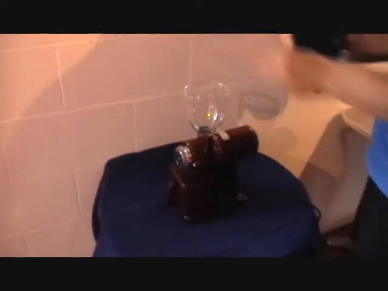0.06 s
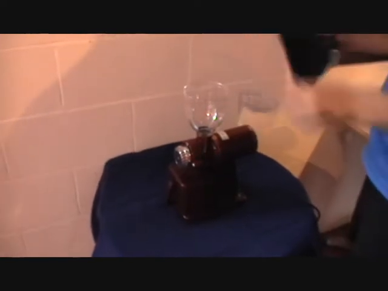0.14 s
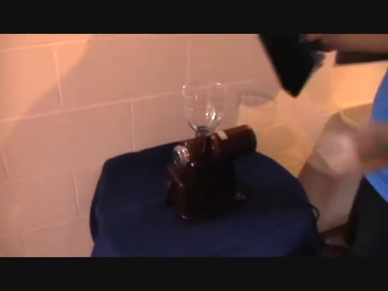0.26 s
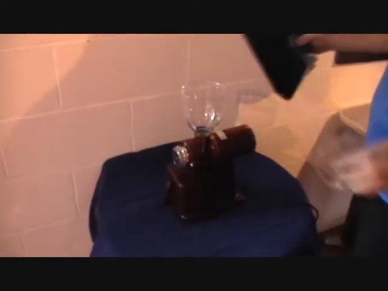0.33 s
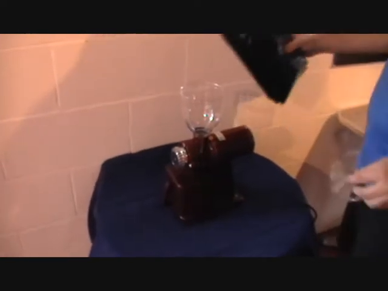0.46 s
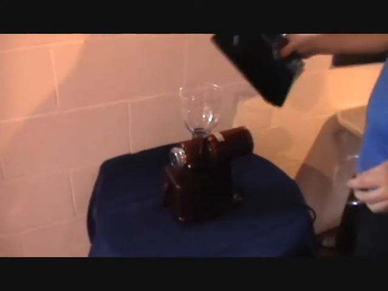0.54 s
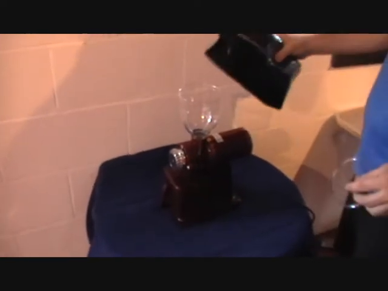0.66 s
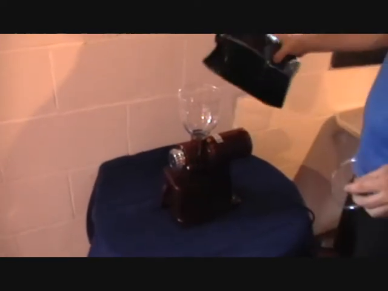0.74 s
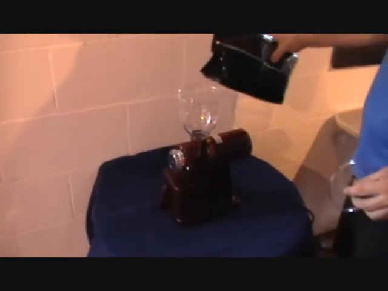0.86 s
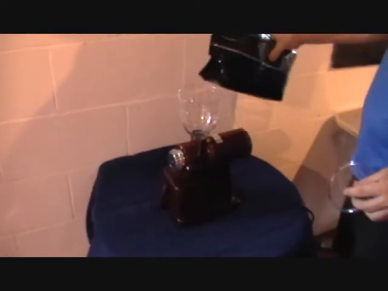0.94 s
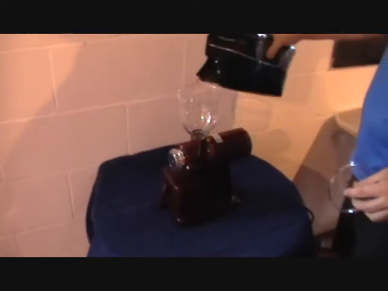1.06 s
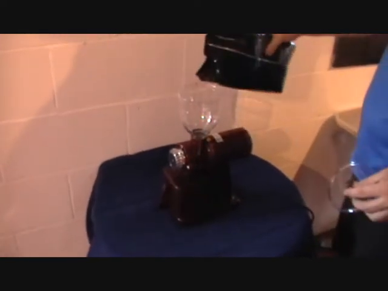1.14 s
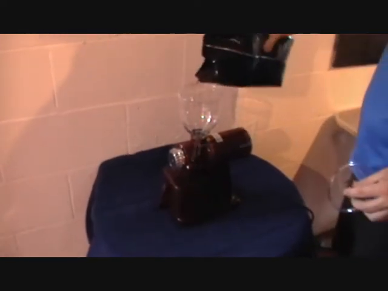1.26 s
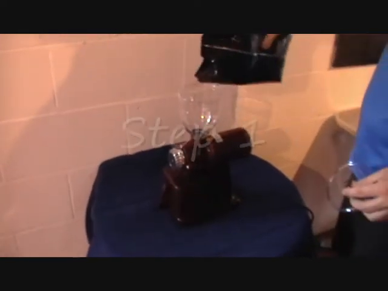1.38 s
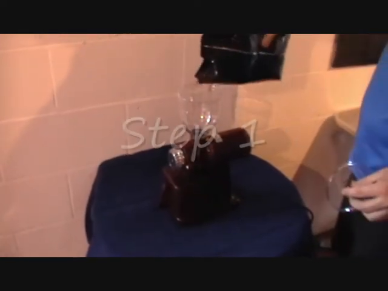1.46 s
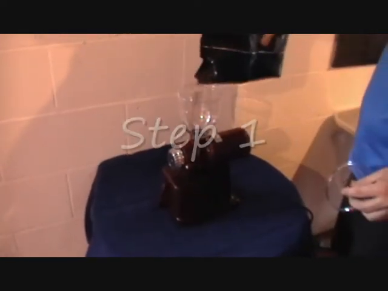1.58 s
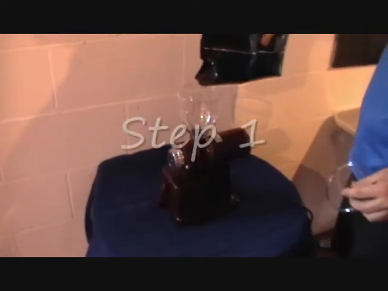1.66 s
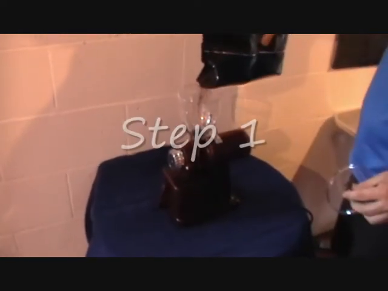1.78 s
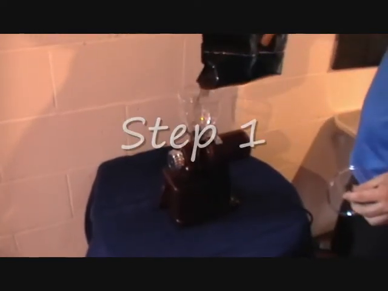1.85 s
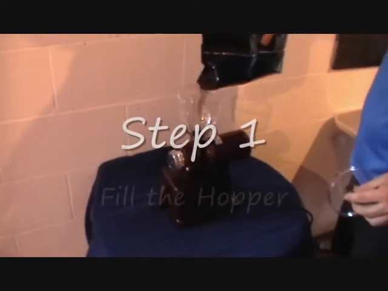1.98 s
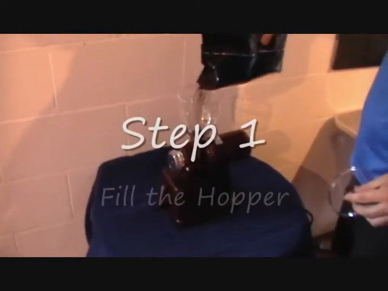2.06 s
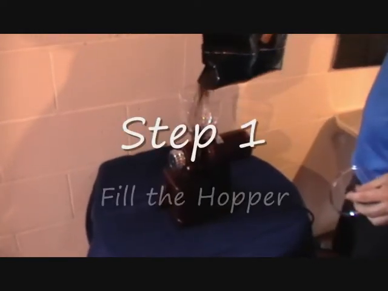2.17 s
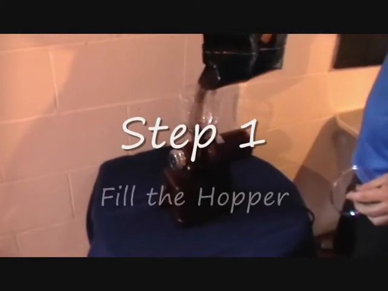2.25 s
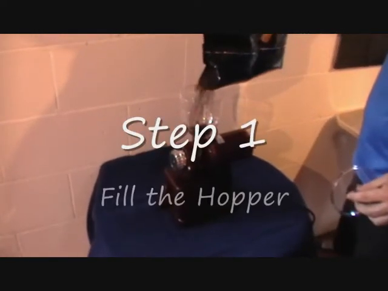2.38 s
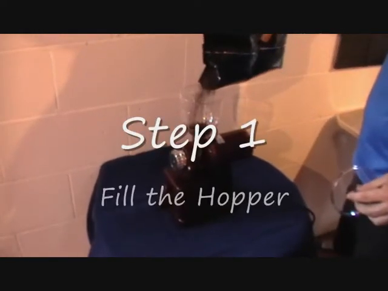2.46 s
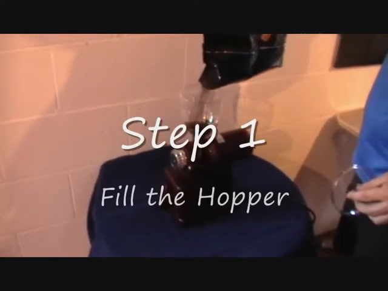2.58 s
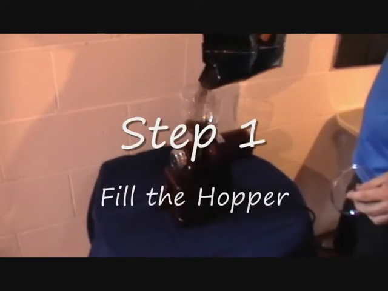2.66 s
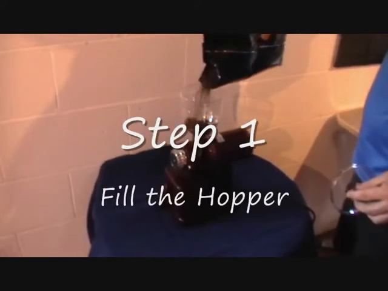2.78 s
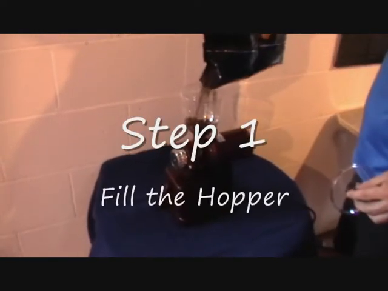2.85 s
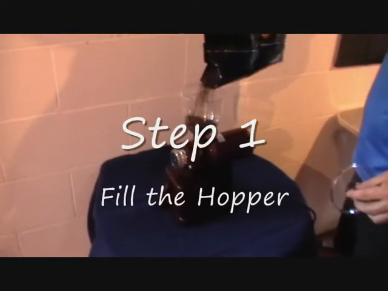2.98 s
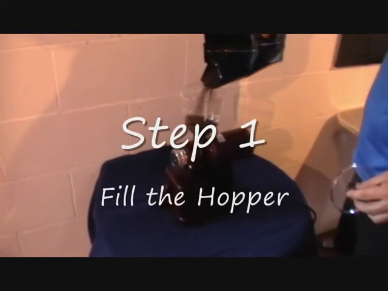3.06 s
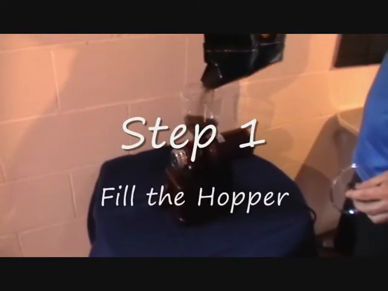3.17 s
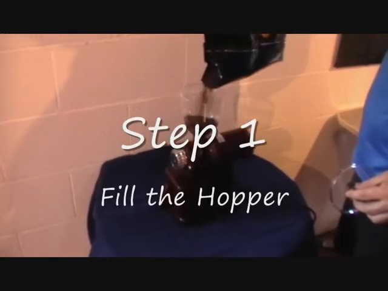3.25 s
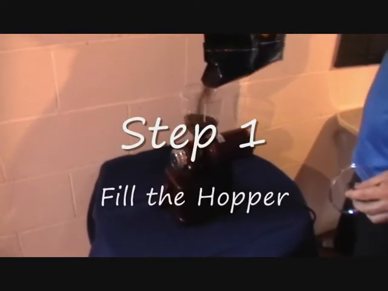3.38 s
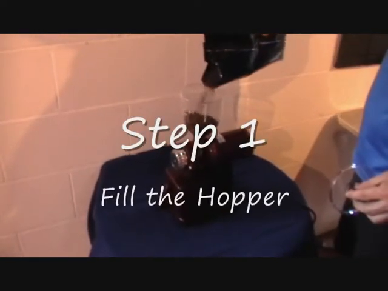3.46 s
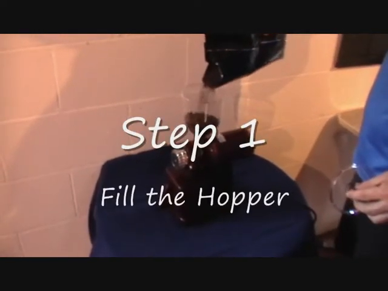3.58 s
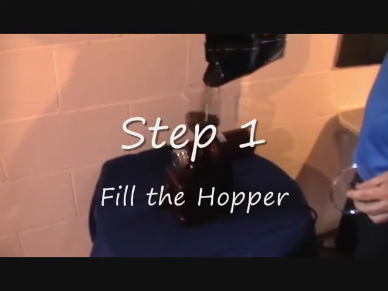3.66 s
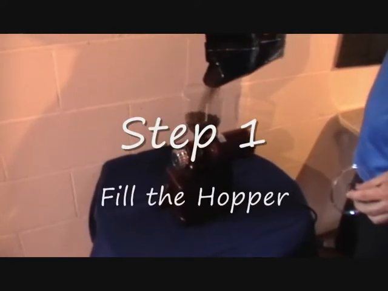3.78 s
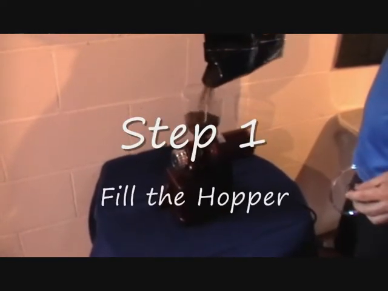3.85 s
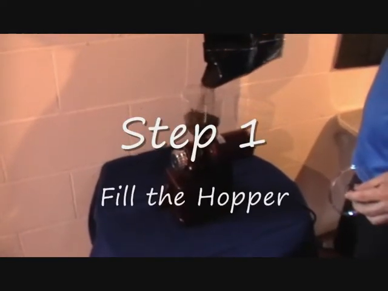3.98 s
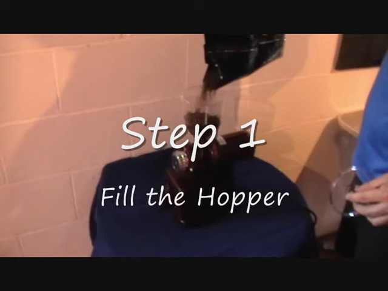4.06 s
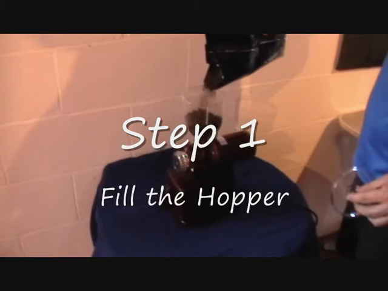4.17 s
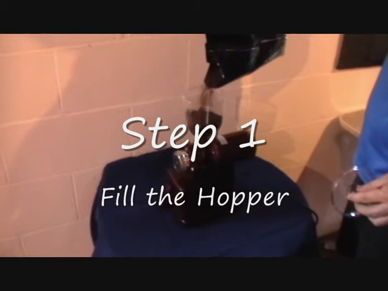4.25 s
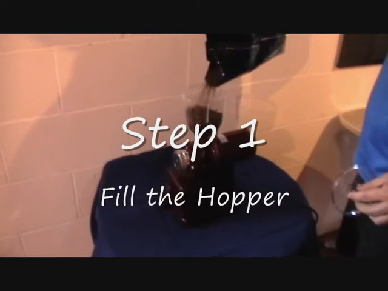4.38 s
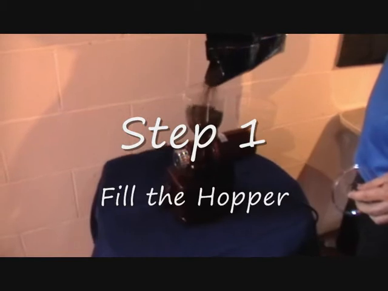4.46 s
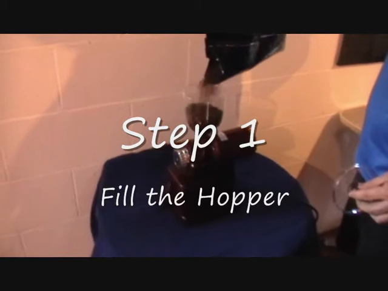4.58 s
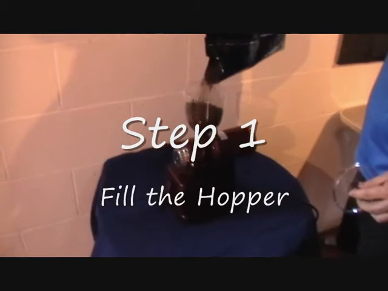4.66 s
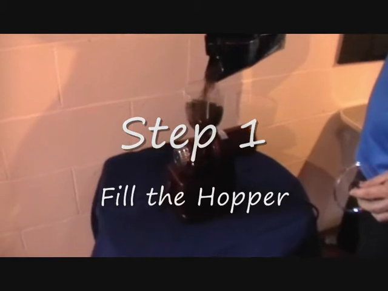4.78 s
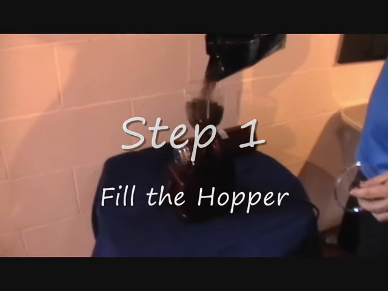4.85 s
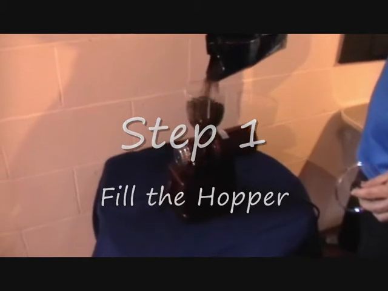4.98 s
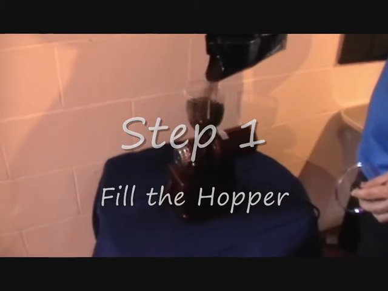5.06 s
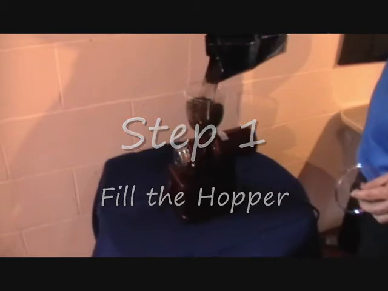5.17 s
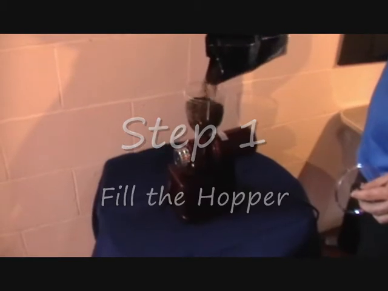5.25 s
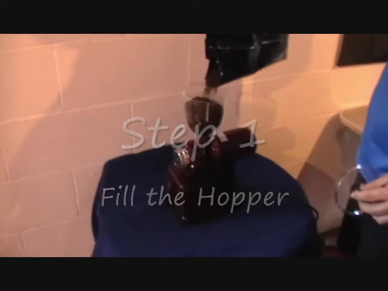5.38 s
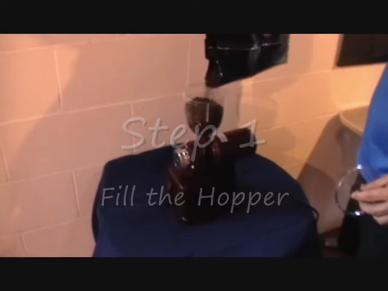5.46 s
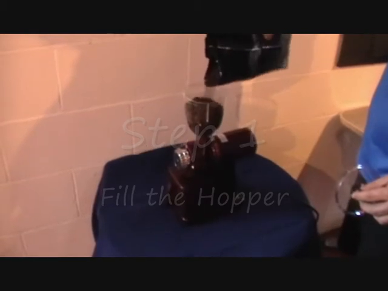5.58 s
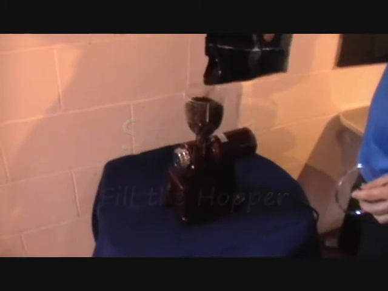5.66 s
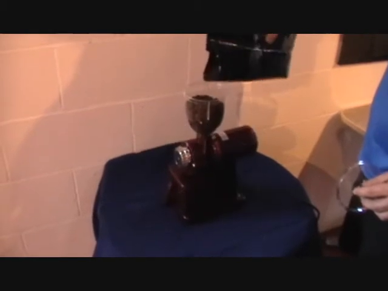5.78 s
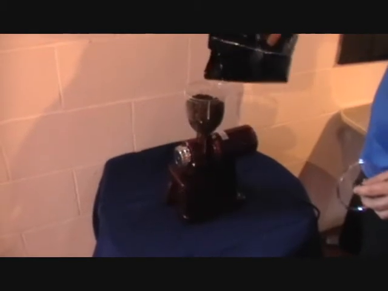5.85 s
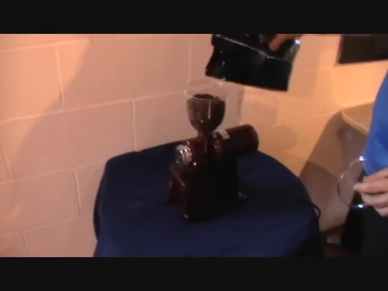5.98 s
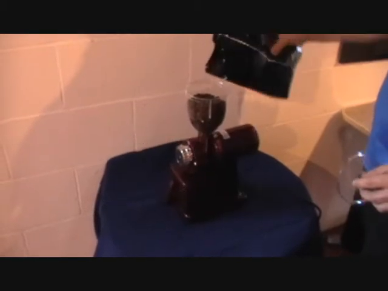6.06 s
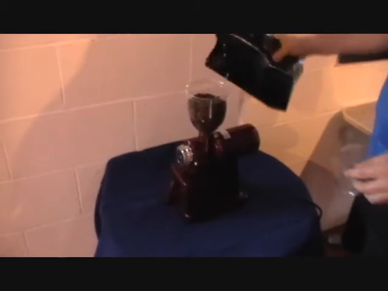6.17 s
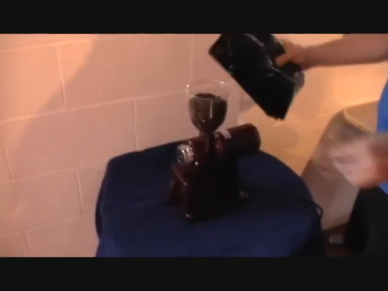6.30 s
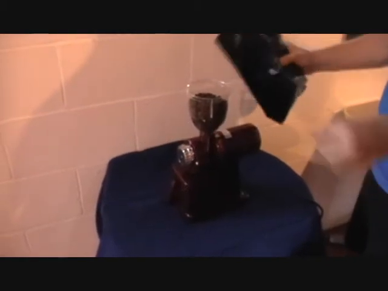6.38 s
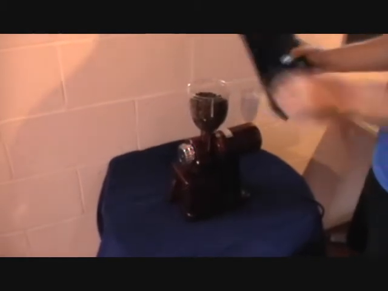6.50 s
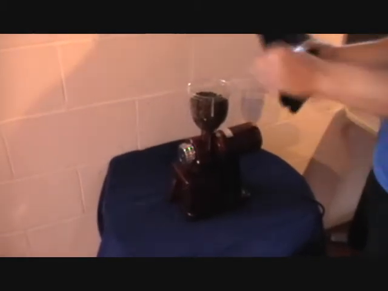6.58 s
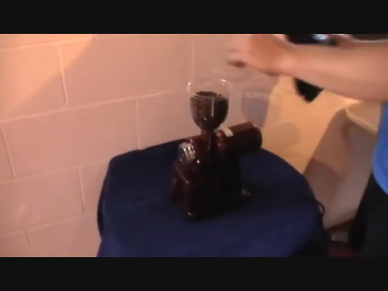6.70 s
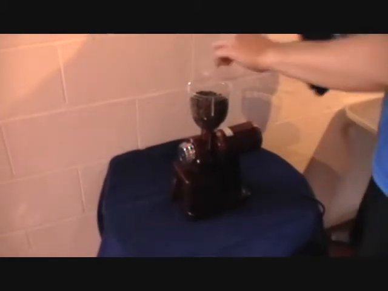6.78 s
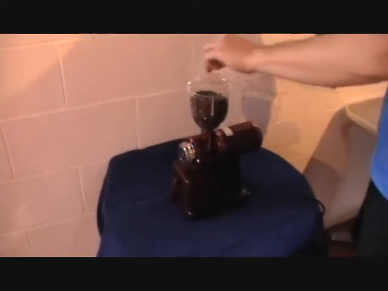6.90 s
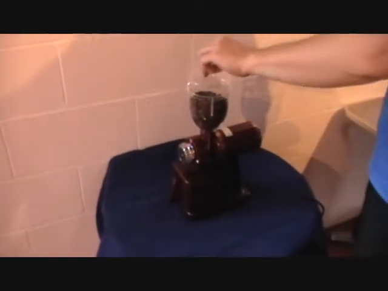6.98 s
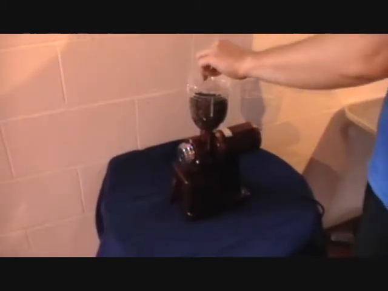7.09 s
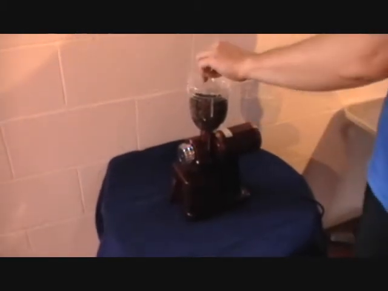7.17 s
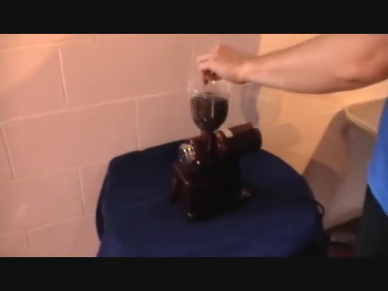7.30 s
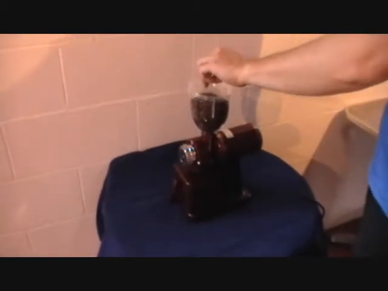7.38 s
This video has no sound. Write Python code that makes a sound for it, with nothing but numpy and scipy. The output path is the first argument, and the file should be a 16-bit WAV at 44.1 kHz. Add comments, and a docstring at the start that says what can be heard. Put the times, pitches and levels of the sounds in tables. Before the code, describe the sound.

Coffee beans slide in a foil bag, then rattle brightly into an empty hopper, dulling as it fills, ending with foil snaps in a humming hard-walled room.

```python
"""Coffee beans are poured from a foil bag into a grinder's hopper in a hard-walled room. Duct-resonant noise hums
throughout; first a lid squeaks in rough tone glides, and beans slide in the bag as grains of noise while foil snaps.
The first beans then strike the empty funnel's modes; as it fills they excite the broad, short modes of the heap,
over narrow-band noise whose hollow note rises. Afterwards the foil snaps and the beans slide again."""
import sys
import numpy as np
from scipy import signal
from scipy.fft import rfft, irfft, next_fast_len
from scipy.io import wavfile
from scipy.ndimage import uniform_filter1d, map_coordinates

SR = 44100
rng = np.random.default_rng(int(sys.argv[2]) if len(sys.argv) > 2 else 0)


def materialize(psi):
    """Save the field psi as 16-bit PCM at rate SR to the path in sys.argv[1].

    A 1-D psi becomes a single channel; in a 2-D psi each row is a channel.
    """
    bounded = np.clip(np.atleast_2d(psi).T, -1, 1)
    quanta = np.round(bounded * 32767).astype(np.int16)
    wavfile.write(sys.argv[1], SR, quanta)


N = 327663


def amp(db):
    """Level: decibels become an amplitude ratio."""
    return 10 ** (np.asarray(db) / 20)


def unit(x):
    """Normalisation: the signal is scaled to unit RMS."""
    return x / np.sqrt(np.mean(x ** 2) + 1e-20)


def along(points, hz):
    """Logarithmic pitch scale: (Hz, value) points are interpolated over log frequency."""
    f, v = np.transpose(points)
    return np.interp(np.log(hz + 1), np.log(f + 1), v)


def curves(rows):
    """Envelope: one value per sample for each column after the time, and a gate open while the table lasts."""
    s, *cols = np.transpose(rows)
    t = np.arange(N) / SR
    gate = np.interp(t, [s[0] - .03, s[0], s[-1], s[-1] + 0.068], [0, 1, 1, 0])
    return [np.interp(t, s, c) for c in cols] + [gate]


def filtered(x, response):
    """Linear filtering: the spectrum is multiplied by a response of frequency."""
    m = next_fast_len(N + SR // 2)
    return irfft(rfft(x, m) * response(np.fft.rfftfreq(m, 1 / SR)), m)[..., :N]


def coloured(x, spectrum):
    """Minimum phase: a causal filter with the given (Hz, dB) gain is made by folding its cepstrum."""
    gain = amp(along(spectrum, np.fft.rfftfreq(2048, 1 / SR)))
    cepstrum = irfft(np.log(gain + 1e-6))
    cepstrum[1:1024] *= 2
    cepstrum[1025:] = 0
    impulse_response = irfft(np.exp(rfft(cepstrum)))
    return signal.fftconvolve(x, impulse_response)[:N]


def mode(x, hz, width_hz):
    """Resonance: one second-order mode with gain 1 at its peak; a wider mode rings for less time."""
    return signal.lfilter(*signal.iirpeak(hz, hz / width_hz, SR), x)


def grit(density, smooth):
    """Friction noise: dense random contacts stand out of a smooth rush."""
    contact = (rng.random(N) < density) * np.minimum(rng.exponential(1.75, N), 4.5)
    return rng.standard_normal(N) * (smooth + contact)


def burst(hz, octaves, t60, echo_db):
    """Transient and diffuse field: a decaying noise click, then the room's duller answer to it."""
    t = np.arange(SR // 2) / SR
    # (distance from the centre in units of octaves, dB)
    steps = [(-4.5, -25.5), (-1, 1.0), (0, 9.0), (2.13, -18), (1.0, -9.5), (4.0, -50)]
    shape = [(hz * 2 ** (k * octaves), db) for k, db in steps]

    def noise():
        return coloured(rng.standard_normal(len(t)), shape)[:len(t)]

    click = unit(noise()) * amp(-60 * t / t60) * (1 - np.exp(-t / 0.00027))
    wash = unit(signal.lfilter(*signal.butter(1, 7000, fs=SR), noise()))
    return click + amp(echo_db - 60 * t / 0.57) * (1 - np.exp(-t / 0.0042)) * wash


# Level of the background hum, lower while the pour is loudest.
# Each row: time in seconds, level of the air in dB, level of the wavering duct note in dB.
HUM_LEVELS = [(0, -57.5, -67), (.5, -62, -64), (0.91, -62, -56), (1.55, -60.5, -73.5), (2.38, -68, -71.5),
              (2.61, -70, -73.5), (2.95, -60, -61.5), (4.6, -59, -66.5), (6.4, -61, -66),
              (7.43, -60, -70.5)]
# Spectrum of the moving air. Each row: frequency in Hz, relative level in dB.
AIR_SPECTRUM = [(20, -30.5), (45, -27), (75, -3), (130, -12.5), (200, -4.5), (300, -4.5), (600, -8),
                (1200, -11.5), (2000, -19.5), (4000, -25.5), (7000, -28), (11000, -47.5), (16000, -46)]
# Resonances of the duct. Each row: frequency in Hz, width in Hz, level relative to the other resonances in dB.
DUCT_MODES = [(101.7, 11, -4), (195.6, 14, 2), (234, 14, -3.5)]


def hum():
    """Duct resonance: broad ventilation noise is joined by noise in a few boomy modes and a wavering narrow band."""
    air_db, note_db, _ = curves(HUM_LEVELS)
    boom = sum(amp(db) * unit(mode(rng.standard_normal(N), hz, width_hz)) for hz, width_hz, db in DUCT_MODES)
    air = unit(filtered(rng.standard_normal(N), lambda hz: amp(along(AIR_SPECTRUM, hz))))
    note = unit(mode(rng.standard_normal(N), 161, 2.8))  # so narrow that its level wavers
    return amp(air_db) * (air + amp(-5) * boom) + amp(note_db) * note


# Squeaks of the lid.
# Each row: start in seconds, length in seconds, first frequency in Hz, last frequency in Hz, level in dB.
LID_SQUEAKS = [(0.027, 0.099, 5320, 6700, -66), (0.05, 0.16, 2790, 3480, -65.5),
               (0.023, .05, 4150, 4400, -72.5), (.06, 0.17, 5400, 5700, -70.5),
               (0.087, 0.12, 6800, 7100, -83), (0.166, 0.093, 4600, 4550, -77)]


def squeaks():
    """Frictional squeal: plastic on plastic gives thin tone glides, roughened by random frequency modulation."""
    out = np.zeros(N)
    for s, length, from_hz, to_hz, db in LID_SQUEAKS:
        u = np.linspace(0, 1, round(length * SR))
        hz = from_hz + (to_hz - from_hz) * np.sqrt(u) + 850 * rng.standard_normal(len(u))
        swell = np.sin(np.pi * u ** 0.46)
        out[round(s * SR):][:len(u)] += amp(db) * swell * np.sin(2 * np.pi * np.cumsum(hz) / SR)
    return out


# Beans sliding in the bag, before and after the pour: one list of rows for each slide.
# Each row: time in seconds, level of the low part in dB, level of the treble part in dB.
BAG_SLIDES = [
    [(0.1, -68.5, -94), (0.442, -59, -72.5), (0.63, -59, -69), (0.926, -52, -55.5), (1.05, -51.5, -53),
     (1.35, -57, -63.5), (1.5, -59, -55)],
    [(6.55, -85, -78), (6.724, -70, -73.5), (6.862, -57.5, -66), (7.064, -47.5, -56), (7.152, -48.5, -57.5),
     (7.43, -57, -65)],
]
# Spectrum of the low part. Each row: frequency in Hz, relative level in dB.
SLIDE_LOW_SPECTRUM = [(150, -56.5), (250, -24), (291, -1.5), (355, -4), (993, 1), (1080, 0.5), (5000, -15),
                      (6500, -35), (11000, -120)]
# Spectrum of the treble part. Each row: frequency in Hz, relative level in dB.
SLIDE_HIGH_SPECTRUM = [(1470, -23), (2500, 0), (3690, -8), (4690, -4.5), (8020, -3), (12800, -12),
                       (16000, -20)]


def slides():
    """Sliding friction: beans rub along the foil in dense soft grains, low and treble levels moving apart."""
    out = np.zeros(N)
    for rows in BAG_SLIDES:
        low_db, high_db, gate = curves(rows)
        out += gate * amp(low_db) * unit(coloured(grit(0.016, 0.58), SLIDE_LOW_SPECTRUM))
        out += gate * amp(high_db) * unit(coloured(grit(0.013, 0.54), SLIDE_HIGH_SPECTRUM))
    return out


def place(out, s, sound):
    """Superposition: a sound is added from its start in seconds."""
    out[round(s * SR):][:len(sound)] += sound


# Soft knocks of the bag in the hand. Each row: start in seconds, level in dB, centre frequency in Hz.
BAG_KNOCKS = [(0.286, -43, 636), (1.064, -48, 580), (3.409, -41.5, 1200), (3.539, -45.5, 810),
              (4.25, -47, 1000), (4.452, -42, 1580), (5.481, -44.5, 1302), (7.063, -44, 1210),
              (7.372, -48, 1000)]


def knocks():
    """Damped impact: a soft blow is a broad noise burst around a low centre, with no foil click."""
    out = np.zeros(N + SR)
    for s, db, hz in BAG_KNOCKS:
        place(out, s, amp(db) * burst(hz, 1.6, t60=0.062, echo_db=-11.5))
    return out[:N]


# Foil snaps and stray beans.
# Each row: start in seconds, level in dB, centre frequency in Hz, thump relative to the snap in dB.
FOIL_SNAPS = [(0.4413, -34, 7700, -26), (0.5805, -44, 7900, -15), (0.593, -43, 3670, -20),
              (0.733, -44, 3550, -18), (0.753, -39, 6880, -7.5), (0.9756, -43.5, 4540, -4),
              (1.1613, -41.5, 9100, -17), (1.274, -46, 4870, -32), (5.7587, -51, 8360, -33),
              (5.7744, -47, 11400, -20), (5.8097, -48.5, 9940, -28), (5.8234, -51.5, 10770, -22),
              (5.8768, -46.5, 12300, -33), (5.886, -42.5, 6400, -32), (5.9224, -46, 5960, -30),
              (5.952, -43, 9920, -36), (6.0457, -52, 6440, -20), (6.108, -24.5, 6800, -46),
              (6.2516, -45.5, 5950, -29)]


def snaps():
    """Sudden buckling: a short bright click carries a softer, longer thump beneath it."""
    out = np.zeros(N + SR)
    for s, db, hz, thump_db in FOIL_SNAPS:
        click = burst(hz, 0.61, t60=0.02, echo_db=-22)
        thump = burst(1200, 1.0, t60=0.067, echo_db=-29)
        place(out, s, amp(db) * (click + amp(thump_db) * thump))
    return out[:N]


def contacts(s, size, tumble_s, count):
    """Repeated impact: a landing bean tumbles in a short run of contacts; returns sample index and strength."""
    late = rng.gamma(1.3, 1, (len(s), count)) * (np.arange(count) > 0)  # the first contact is not delayed
    at = np.minimum(((s[:, None] + tumble_s * late) * SR).astype(int), N - 1)
    return at, size[:, None] * np.exp(-.2 * late) / np.sqrt(count)


def impulses(at, size):
    """Impulsive force: each contact is one sample of random strength and sign."""
    return np.bincount(at.ravel(), (size * rng.standard_normal(at.shape)).ravel(), N)


def struck(at, size, modes):
    """Modal excitation: each contact strikes a new spot, so every mode gets its own strength and sign."""
    out = np.zeros(N)
    for hz, width_hz, db in modes:
        out += amp(db) * mode(impulses(at, size), hz, width_hz)
    return out


# Share of ringing funnel modes in each contact; the rest is heap. Each row: time in seconds, share from 0 to 1.
RING_SHARE = [(1.3, 0.65), (2.4, 0.81), (2.9, 0.65), (3.3, 0.01), (4.2, 0.25), (5.8, 0.16)]
# Modes of the funnel. Each row: frequency in Hz, width in Hz, relative level in dB.
FUNNEL_MODES = [(2974, 16, -7), (3860, 62, -5.5), (4015, 27, -6), (4500, 83, -9), (4737, 66, -6),
                (4900, 138, -4), (5480, 45, -2.5), (5556, 110, -4), (5830, 65, -6.5), (6040, 57, -5.5),
                (6360, 89, -0.5), (7040, 110, -6.5), (6950, 58, -3), (7230, 120, -10.5), (7784, 59, -6.5),
                (8120, 58, -10.5), (8420, 49, -11.5), (8660, 100, -7), (9065, 48, -6.5), (9820, 31, -9.5),
                (9700, 90, -11), (9500, 140, -19), (11420, 71, -17.5), (10900, 370, -20.5)]
# Modes of beans landing on beans. Each row: frequency in Hz, width in Hz, relative level in dB.
HEAP_MODES = [(2740, 69, -12.5), (3086, 63, -4.5), (4110, 140, -5), (4940, 138, 0.5), (5560, 230, -4.5),
              (6280, 1020, 1), (8210, 350, -6.5), (9690, 360, -9.5)]
# Spectrum of the first instant of a contact. Each row: frequency in Hz, relative level in dB.
CRACK_SPECTRUM = [(900, -30.5), (1500, -30), (2500, -25.5), (3400, -13.5), (4600, -4), (6300, -1.5),
                  (7600, -7), (10000, -9), (13000, -18), (16000, -40)]
# bright tick of a bean on the funnel and on the heap, and its scatter from bean to bean
TREBLE_FUNNEL_DB, TREBLE_HEAP_DB, TREBLE_SCATTER_DB = -15.5, -20, 3.5


def clatter(s, size, tumble_s, count):
    """Damping: contacts share their force between the ringing funnel and the more heavily damped heap."""
    at, size = contacts(s, size, tumble_s, count)
    ring = np.clip(np.interp(at / SR, *np.transpose(RING_SHARE)), 0, 1)
    treble_db = TREBLE_FUNNEL_DB * ring + TREBLE_HEAP_DB * (1 - ring)
    treble_db = treble_db + TREBLE_SCATTER_DB * rng.standard_normal((len(s), 1))
    high_pass = signal.butter(3, 9500, "high", fs=SR)
    bright = signal.lfilter(*high_pass, impulses(at, size * amp(treble_db)))
    crack = coloured(impulses(at, size), CRACK_SPECTRUM)
    wall = struck(at, size * ring, FUNNEL_MODES)
    heap = struck(at, size * (1 - ring), HEAP_MODES)
    return amp(17) * crack + amp(16.5) * bright + amp(34.0) * wall + amp(28.0) * heap


# The bag lets go in surges. Each row: crest in seconds, level over the steady stream in dB.
BAG_SURGES = [(2.0, 9.5), (2.82, -2), (3.03, 3), (3.41, 6), (3.525, 14.5), (3.6, 9.5), (3.82, 6.5),
              (3.96, 13.5), (4.02, 3.5), (4.18, 7.5), (4.29, 4), (4.385, 4.5), (4.74, 6.5), (4.85, 4),
              (4.93, 9), (5.14, 4), (5.49, 6.5)]
SURGE_RISE_S, SURGE_FALL_S = 0.017, 0.026  # time from the crest to 1/e of its dB


def surge_db():
    """Unsteady granular flow: each surge changes the level along a bell that is steeper before its crest."""
    t = np.arange(N) / SR
    total = np.zeros(N)
    for s, db in BAG_SURGES:
        spread_s = np.where(t < s, SURGE_RISE_S, SURGE_FALL_S)
        total += db * np.exp(-((t - s) / spread_s) ** 2)
    return total


# The steady stream, before its surges.
# Each row: time in seconds, size of the small beans in dB, level of the rustle along the foil in dB.
STREAM = [(1.31, -60.5, -59.5), (1.62, -59, -51), (1.7, -42, -49), (1.9, -42, -53), (2.16, -36, -44.5),
          (2.63, -34.5, -66), (2.76, -36.5, -63.5), (3.07, -38.5, -45), (3.3, -50.5, -50),
          (3.7, -54, -47.5), (4.39, -51, -45.5), (5.01, -56, -46.5), (5.33, -56.5, -47.5),
          (5.46, -62, -48.5), (5.72, -68.5, -58), (6.0, -80, -82.5)]
# The loudest beans. Each row: landing in seconds, strength in dB.
LOUD_BEANS = [(1.2992, -15), (1.3382, -18.5), (1.365, -14), (1.398, -15), (1.4344, -19), (1.4624, -23.5),
              (1.4983, -14.5), (1.5276, -16), (1.5605, -11.5), (1.6002, -13), (1.639, -20), (1.668, -14.5),
              (1.6886, -11.5), (1.7184, -14.5), (1.745, -13), (1.7816, -16.5), (1.8106, -14.5),
              (1.89, -15.5), (1.9264, -15), (1.9614, -11.5), (2.1314, -15), (2.1867, -18), (2.2397, -18),
              (2.439, -27), (2.764, -16), (2.8195, -15.5), (2.8982, -23), (2.9407, -15), (2.998, -17),
              (3.0226, -18), (3.0674, -18), (3.1129, -17), (3.1922, -19.5), (3.2412, -21.5),
              (3.3522, -22.5), (3.3934, -25), (3.42, -23.5), (3.4823, -27.5), (3.4953, -26), (3.5161, -21),
              (3.5881, -22), (3.694, -27.5), (3.749, -28), (3.7981, -35.5), (3.817, -22), (3.9159, -24),
              (3.9353, -29.5), (3.9511, -21), (4.013, -23), (4.141, -25), (4.1826, -23), (4.257, -25),
              (4.286, -21.5), (4.3749, -22), (4.515, -28.5), (4.561, -27), (4.719, -27.5), (4.7345, -24),
              (4.7878, -21.5), (4.8448, -26.5), (4.9018, -30), (4.9222, -26.5), (4.9794, -25.5),
              (5.0665, -28.5), (5.121, -24), (5.1523, -28), (5.1827, -31), (5.2569, -34), (5.2978, -32.5),
              (5.4229, -51), (5.4926, -25.5), (5.6938, -34.5)]
# further whole beans: rate, size over the small ones, scatter either way
OTHERS_PER_S, OTHERS_DB, OTHERS_SCATTER_DB = 60, 13, 4


def pour():
    """Poisson process: small contacts and whole beans land at random under the loudest ones."""
    stream_db, _, gate = curves(STREAM)
    stream_db = stream_db + surge_db()
    small = np.flatnonzero(rng.random(N) < gate * .03)
    small_db = stream_db[small] + np.minimum(4.6 * rng.exponential(1, len(small)), 9.5)
    stream = clatter(small / SR, amp(small_db), tumble_s=.0015, count=6)
    others = np.flatnonzero(rng.random(N) < gate * OTHERS_PER_S / SR)
    others_db = stream_db[others] + OTHERS_DB + OTHERS_SCATTER_DB * rng.uniform(-1, 1, len(others))
    loud_s, loud_db = np.transpose(LOUD_BEANS)
    whole = clatter(np.r_[loud_s, others / SR], amp(np.r_[loud_db, others_db]), tumble_s=.0026, count=48)
    return stream + whole


# Spectrum of the rustle. Each row: frequency in Hz, relative level in dB.
RUSTLE_SPECTRUM = [(800, -39), (1500, -8.5), (3000, -6.5), (6000, -6.5), (10000, 4), (13000, 0.5),
                   (16000, -2)]
GUST_DB, GUSTS_PER_S = 3, 70  # largest swing either way, random points per second


def rustle():
    """Amplitude modulation: friction noise, where the beans leave along the foil, flutters at random."""
    _, rustle_db, gate = curves(STREAM)
    points = rng.standard_normal(GUSTS_PER_S * N // SR + 2)
    gusts = map_coordinates(points, [np.arange(N) * GUSTS_PER_S / SR])
    noise = unit(coloured(grit(.06, 0.46), RUSTLE_SPECTRUM))
    return gate * amp(rustle_db + GUST_DB * np.tanh(gusts)) * noise


# Low modes at the bottom of the funnel.
# Each row: frequency in Hz, width in Hz, waking time in seconds, start of the fade in seconds, level in dB,
# speed of the fade in dB per second.
BOTTOM_MODES = [(2084, 34, 1.87, 2.18, -46.5, 60), (2194, 38, 1.365, 1.86, -48, 14.5),
                (2407, 45, 1.3, 2.43, -49.5, 23)]


def throat():
    """Forced resonance: beans at the bottom ring its low modes, each from when it wakes until it is buried."""
    s, bean_db = np.transpose(LOUD_BEANS)
    at = (s * SR).astype(int)
    t = np.arange(N) / SR
    out = np.zeros(N)
    for hz, width_hz, wakes, fades, db, fade_db_per_s in BOTTOM_MODES:
        level_db = db - 1500 * np.maximum(wakes - t, 0) - fade_db_per_s * np.maximum(t - fades, 0)
        blows = np.bincount(at, amp(bean_db + 44 + 5 * rng.standard_normal(len(s))), N)  # 5 dB scatter
        patter = (rng.random(N) < .004) * rng.standard_normal(N)
        ring = mode(mode(blows + amp(19.5) * patter, hz, width_hz), hz, 240)
        # dividing by the running RMS lets level_db set the slow course of the level
        running_rms = np.sqrt(np.abs(uniform_filter1d(ring ** 2, SR // 4)) + 1e-9)
        out += amp(level_db) * ring / running_rms
    return out


# Air in the hopper.
# Each row: time in seconds, frequency of the boom in Hz, level of the boom in dB, level of a thin steady note in dB.
HOPPER_AIR = [(1.3, 601, -76, -65), (1.93, 622, -62, -63.5), (2.35, 670, -61, -63.5),
              (2.6, 714.8, -54, -62), (3, 760.6, -57, -59), (3.6, 804, -56.5, -64),
              (4.25, 835.8, -56.5, -61), (4.4, 839.4, -58, -64), (5.11, 833, -59, -68),
              (5.8, 841, -76, -68)]


def hollow():
    """Cavity resonance: the air above the heap booms, and its note climbs as the space shrinks."""
    hz, boom_db, thin_db, gate = curves(HOPPER_AIR)
    shake = np.array([1, 1j]) @ rng.standard_normal((2, N)) * (rng.random(N) < .02)
    slow = signal.lfilter(*signal.butter(1, 55, fs=SR), shake)
    # a slow complex noise on a carrier is narrow-band noise that follows the gliding note
    boom = unit(np.real(slow * np.exp(2j * np.pi * np.cumsum(hz) / SR)))
    thin = unit(mode(rng.standard_normal(N), 822.7, 20))
    upper = unit(mode(mode(rng.standard_normal(N), 1194, 200), 1194, 200))
    return gate * (amp(boom_db) * boom + amp(thin_db) * thin + amp(-69.5) * upper)


# Reverberation time of the room. Each row: frequency in Hz, time to fall by 60 dB in seconds.
ROOM_T60 = [(1000, 1), (5000, 0.47), (14000, 0.11)]


def room(x):
    """Reverberation: convolution with a noise tail in which each frequency dies at its own speed."""
    hz, t, z = signal.stft(rng.standard_normal(SR // 2), SR, nperseg=256)
    decay = amp(-60 * t / along(ROOM_T60, hz)[:, None])
    tail = signal.istft(z * decay, SR, nperseg=256)[1]
    delayed = np.pad(x, (350, 0))  # samples
    return signal.fftconvolve(delayed, tail / np.linalg.norm(tail))[:N]


def spread(mid, width):
    """Decorrelation: a side signal of random phase is added, with a set level at each frequency."""
    z = signal.stft(mid, nperseg=256)[2]
    side = signal.istft(z * np.exp(2j * np.pi * rng.random(z.shape)), nperseg=256)[1][:N]
    side = filtered(side, lambda hz: amp(along(width, hz)))
    return np.array([mid + side, mid - side])


# Stereo side of the hopper, lid, snaps and knocks. Each row: frequency in Hz, side relative to the middle in dB.
NEAR_SIDE = [(60, 3), (700, -16.5), (1300, -16.5), (2400, -55), (4400, -18), (8100, -13), (15000, 2.5)]
# Stereo side of the hum and bag slides. Each row: frequency in Hz, side relative to the middle in dB.
FAR_SIDE = [(30, -13), (60, -21.5), (200, -27), (400, -16.5), (1300, -12.5), (2400, -10.5), (8100, -10),
            (15000, 1.5)]


def scene():
    """Superposition: all sources add; pour, rustle, throat and squeaks also excite the room."""
    near = pour() + rustle() + throat() + squeaks()
    beans = spread(near + amp(-7) * room(near) + snaps() + knocks() + hollow(), NEAR_SIDE)
    background = spread(slides() + hum(), FAR_SIDE)
    return (beans + background) * amp([[-.2], [.2]])  # left and right balance in dB


def record(dry):
    """Saturation and band limiting: the tallest peaks are rounded off and nothing is kept above the limit."""
    soft = dry / (1 + np.abs(dry / .24) ** 4) ** .25
    return filtered(soft, lambda hz: hz < 15900)


dry = scene()
out = record(dry)
materialize(out)
```